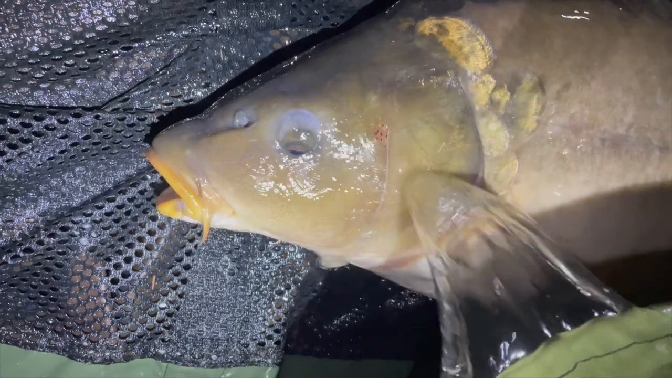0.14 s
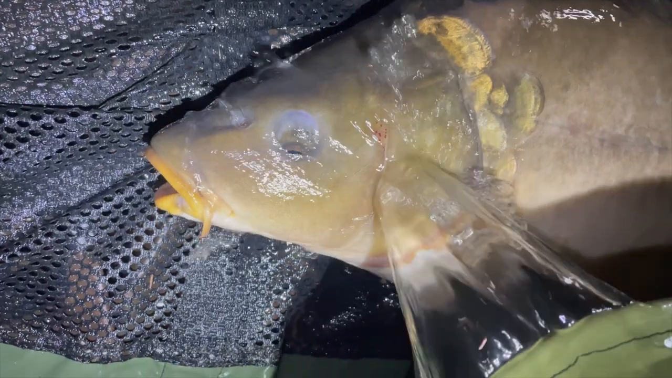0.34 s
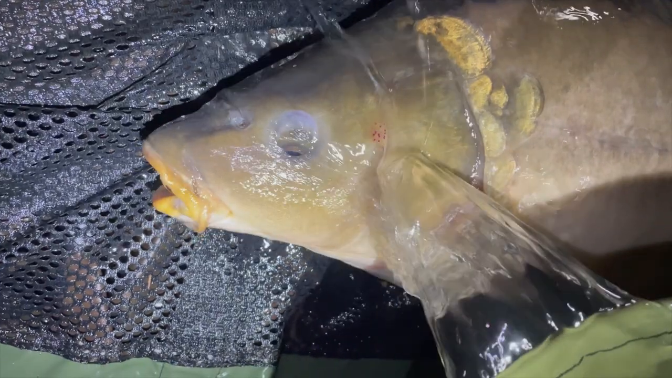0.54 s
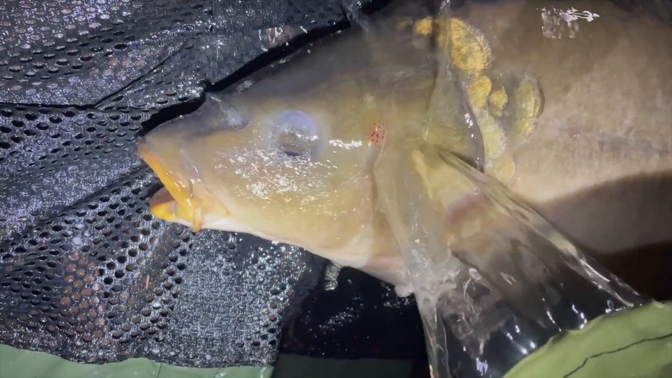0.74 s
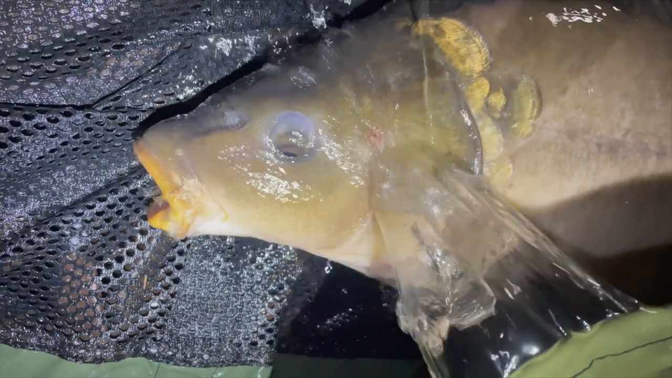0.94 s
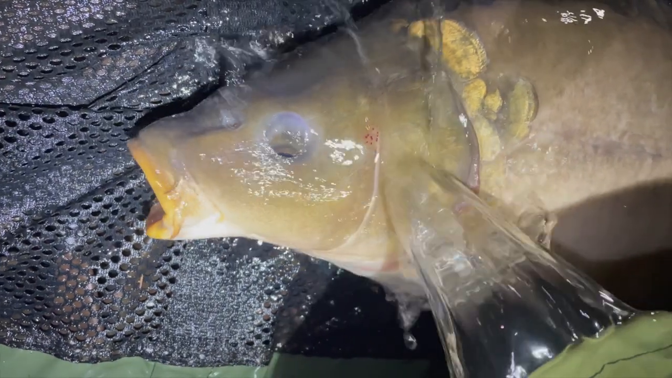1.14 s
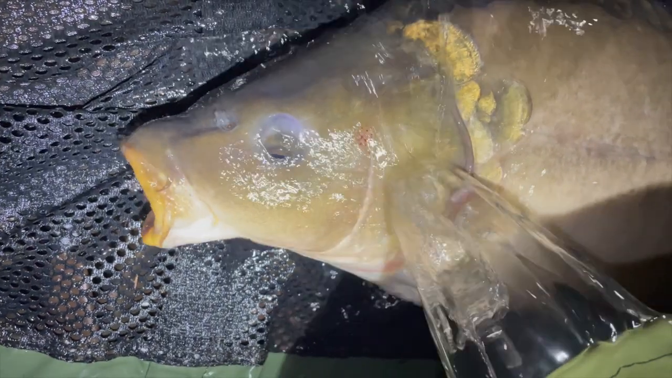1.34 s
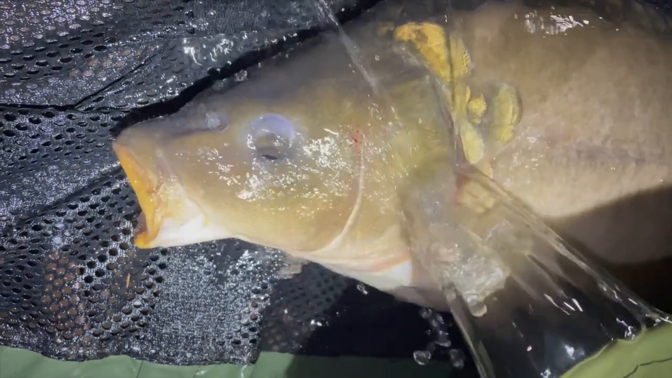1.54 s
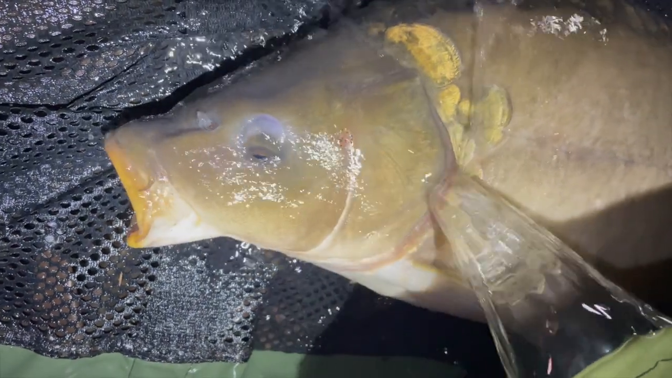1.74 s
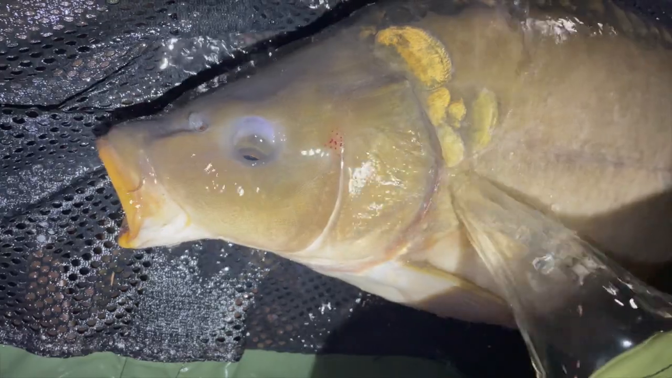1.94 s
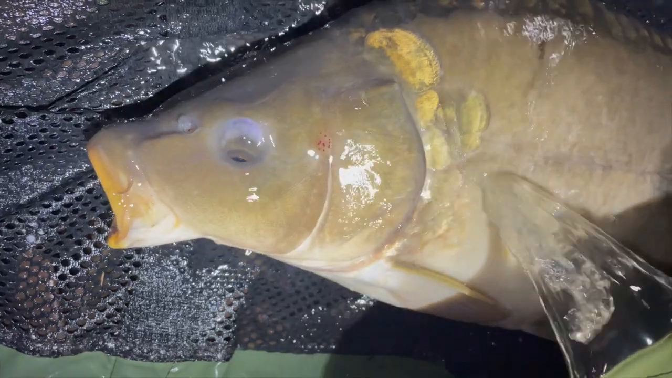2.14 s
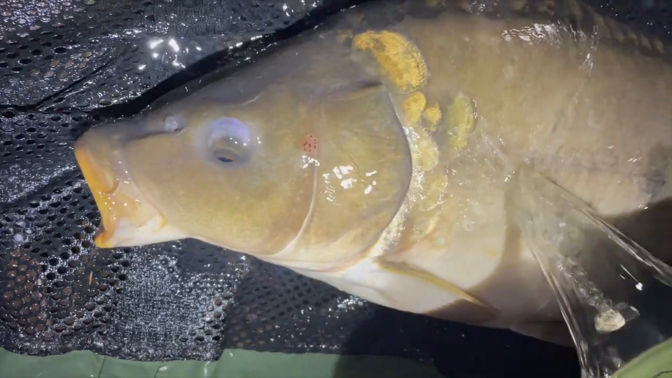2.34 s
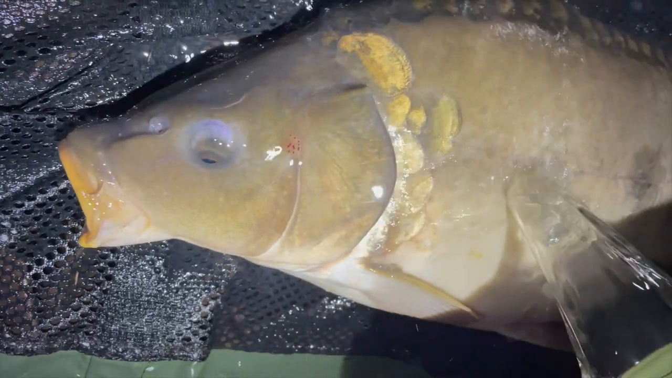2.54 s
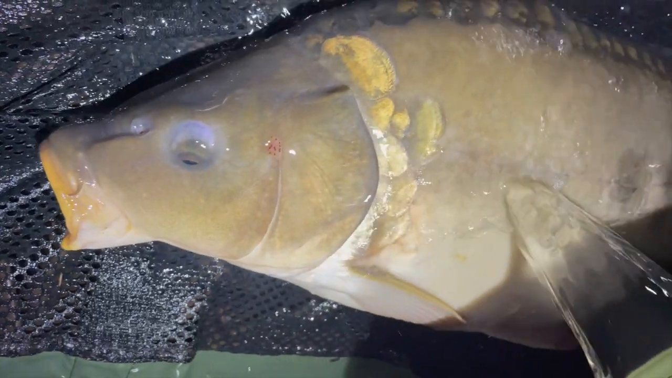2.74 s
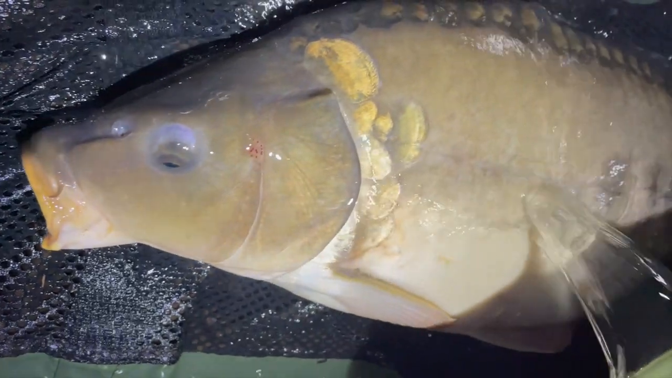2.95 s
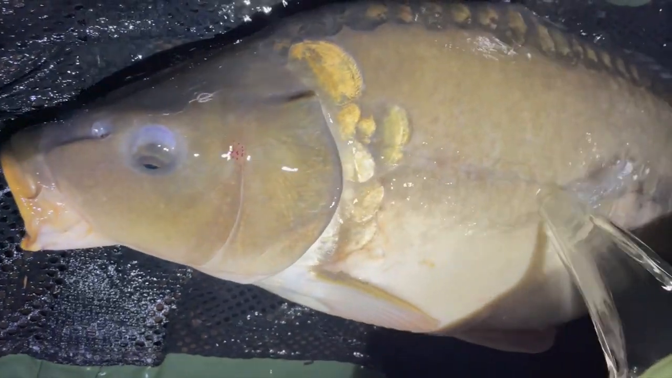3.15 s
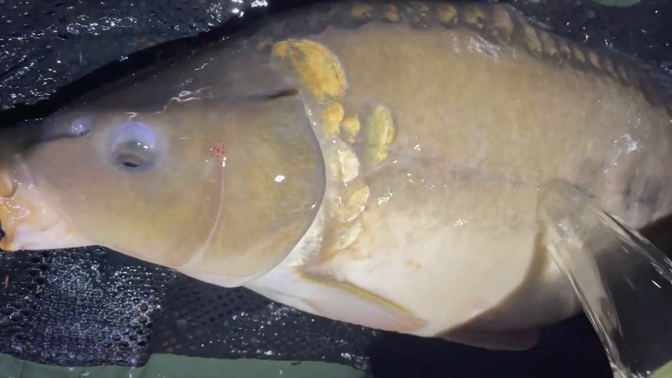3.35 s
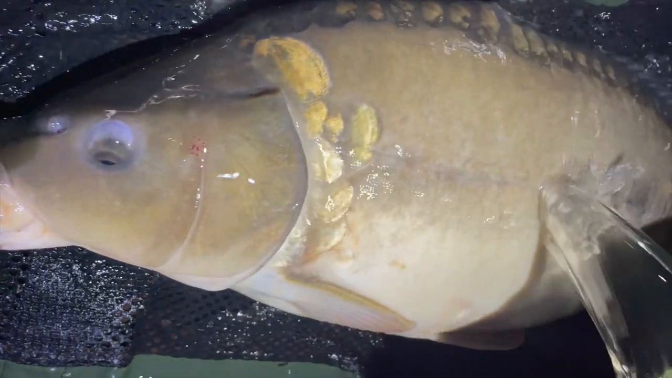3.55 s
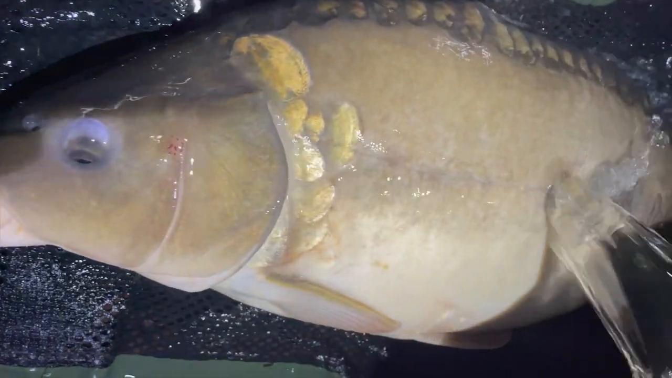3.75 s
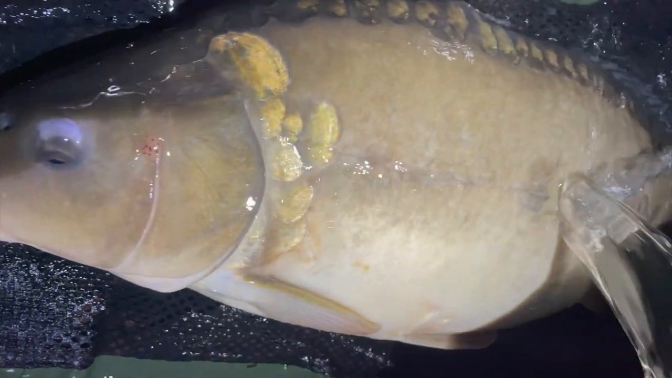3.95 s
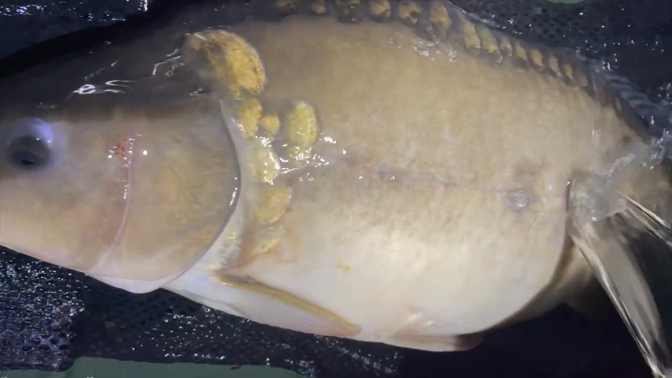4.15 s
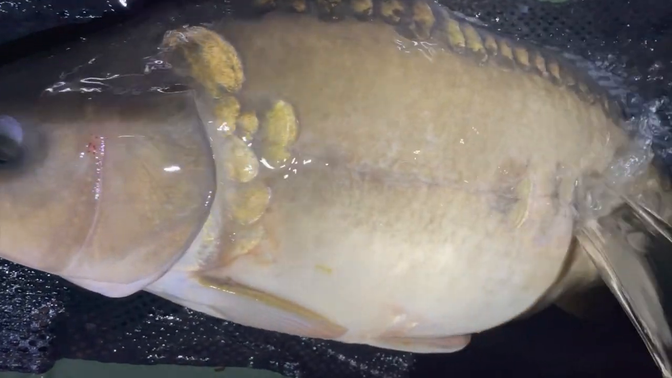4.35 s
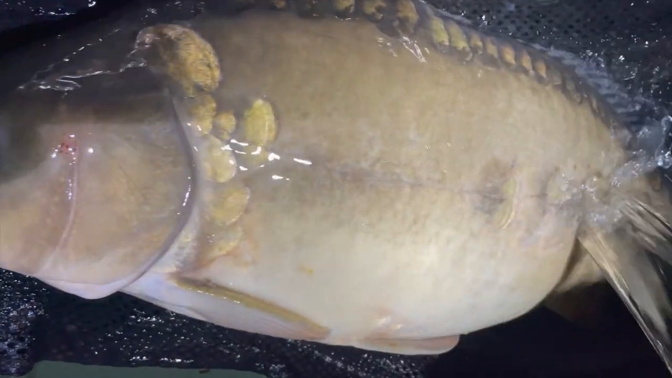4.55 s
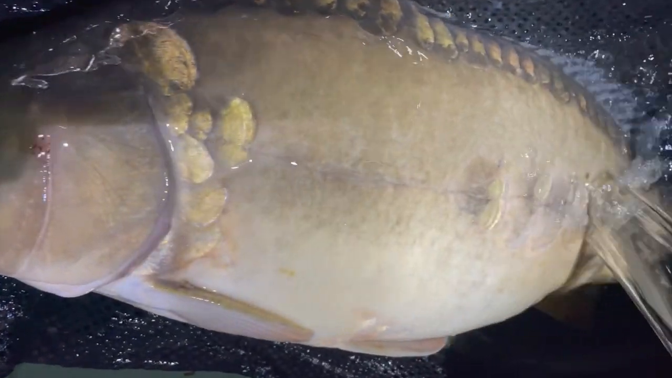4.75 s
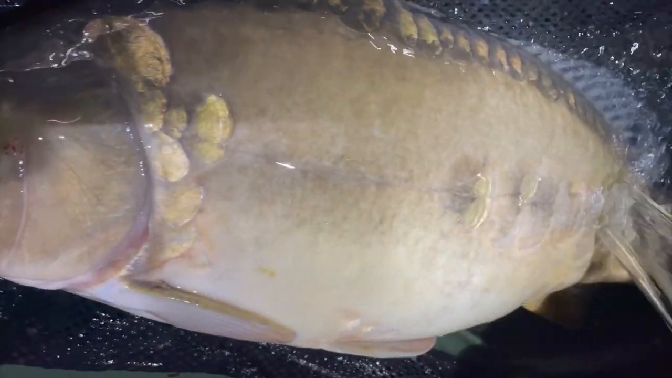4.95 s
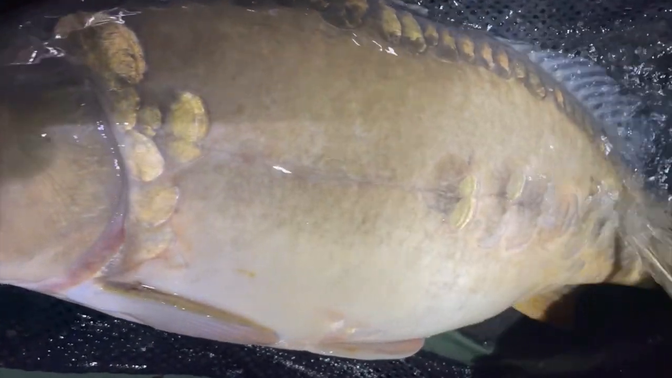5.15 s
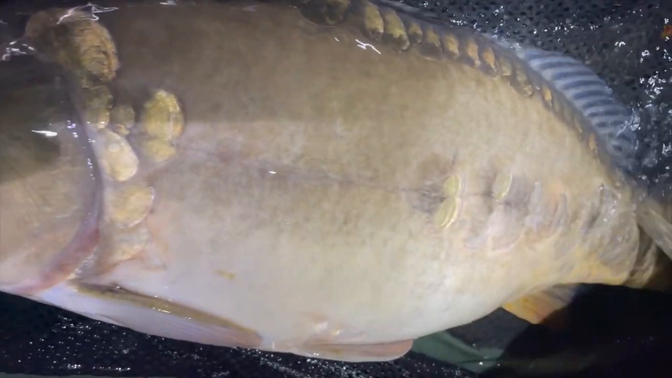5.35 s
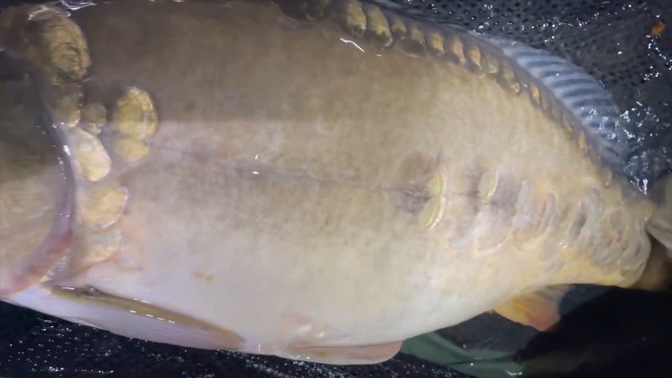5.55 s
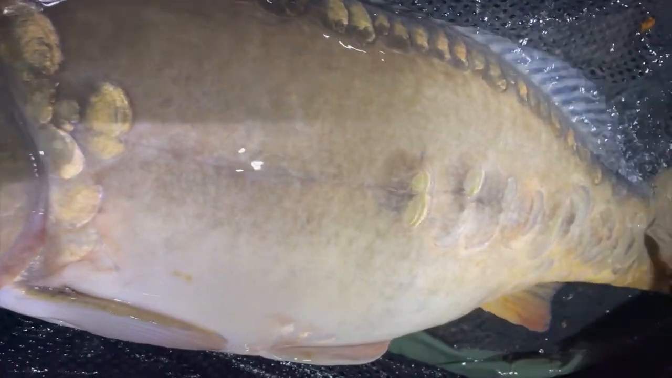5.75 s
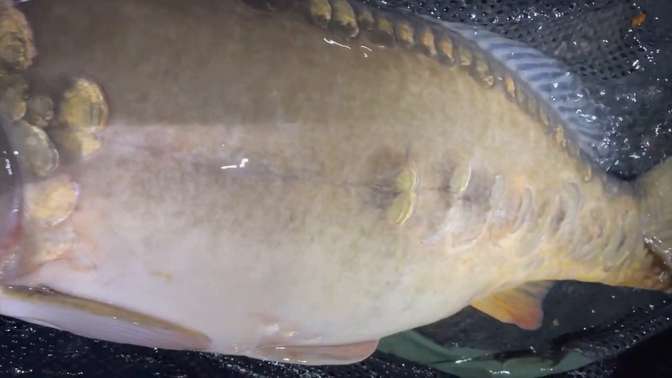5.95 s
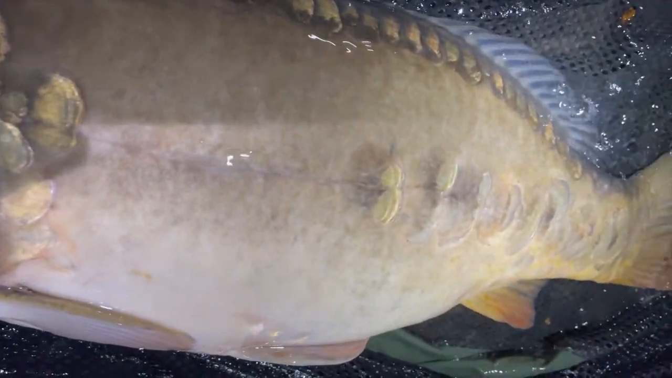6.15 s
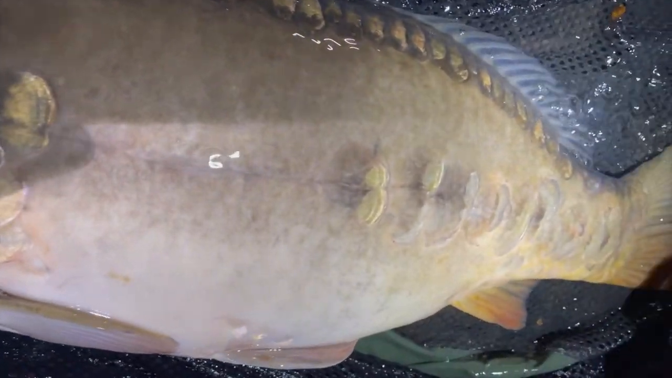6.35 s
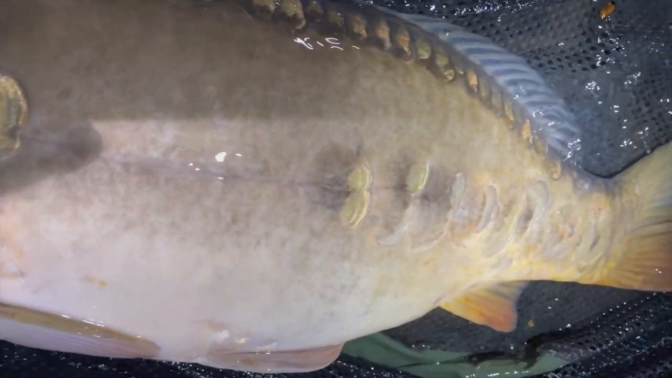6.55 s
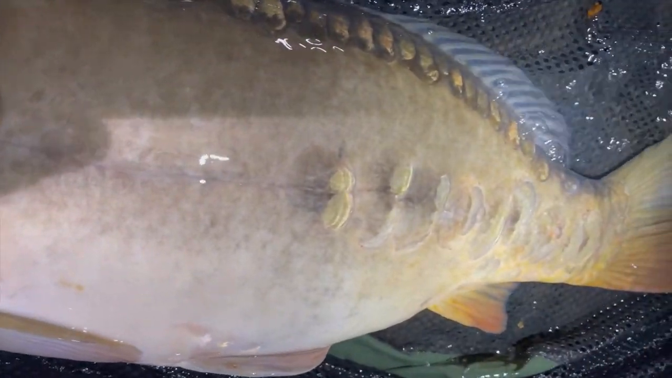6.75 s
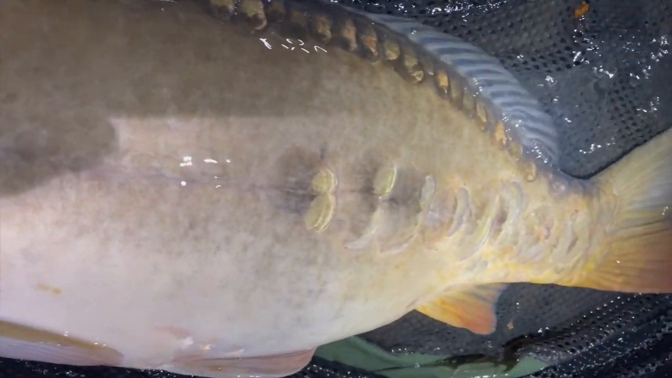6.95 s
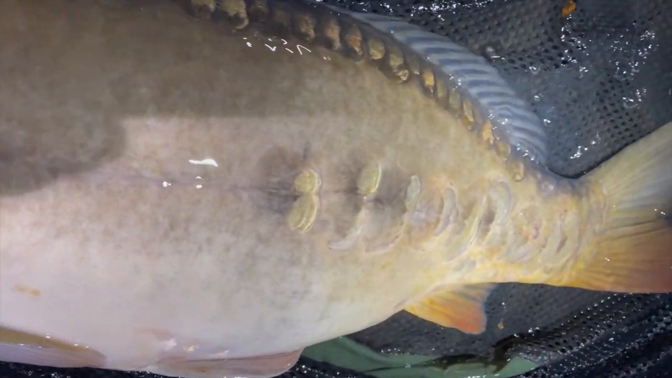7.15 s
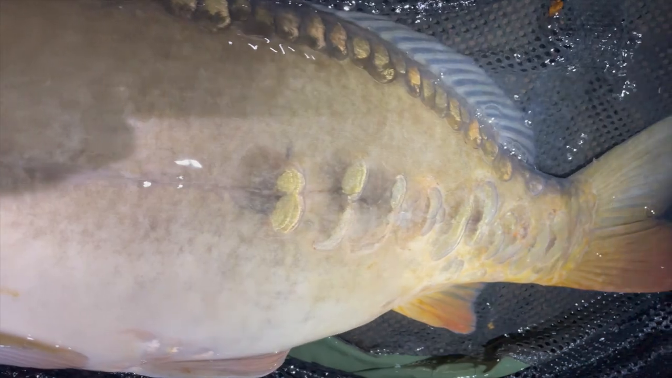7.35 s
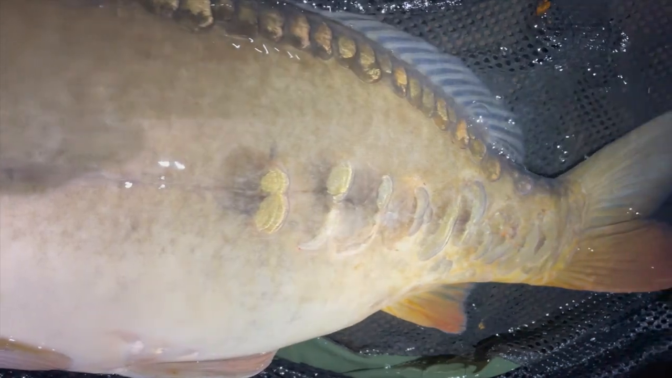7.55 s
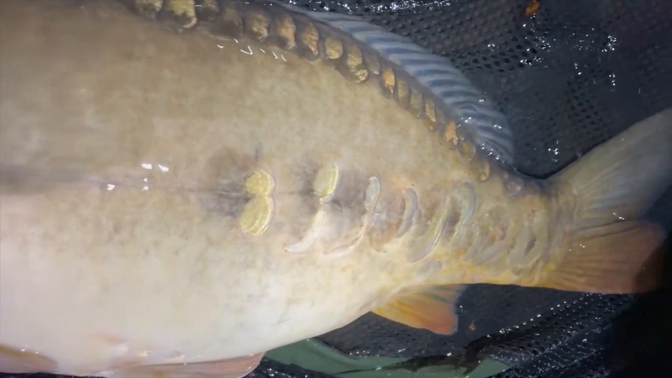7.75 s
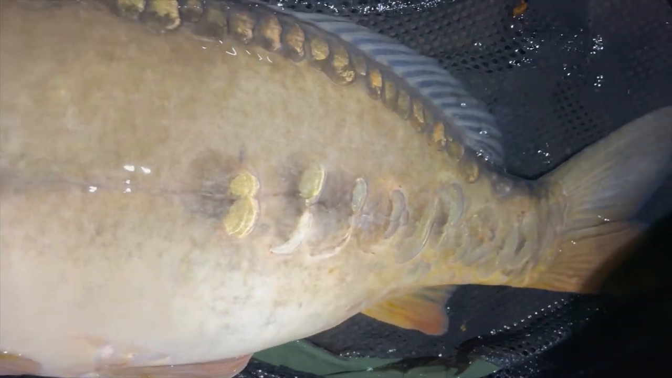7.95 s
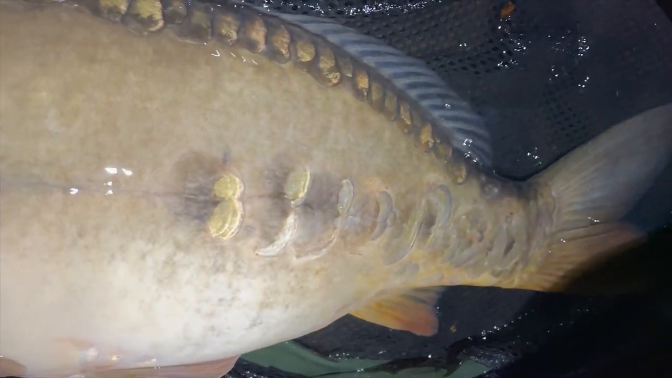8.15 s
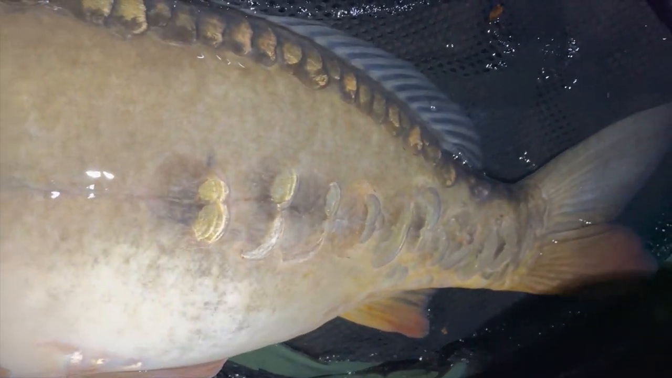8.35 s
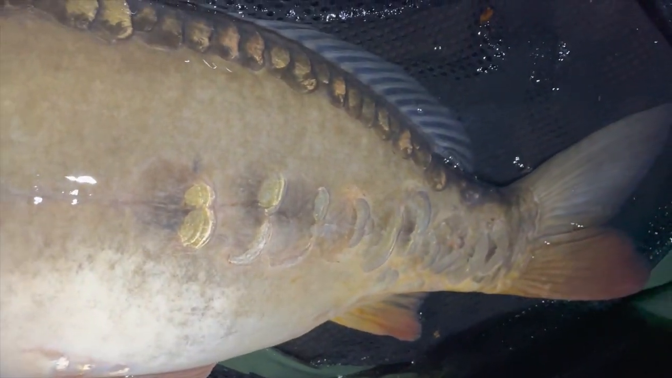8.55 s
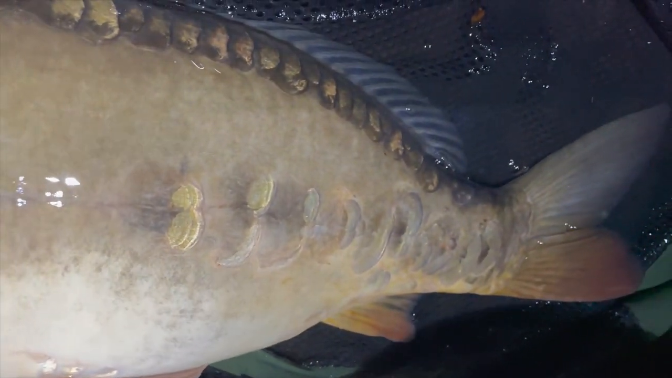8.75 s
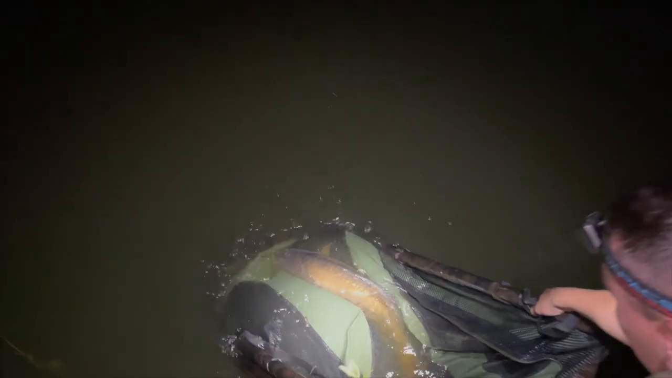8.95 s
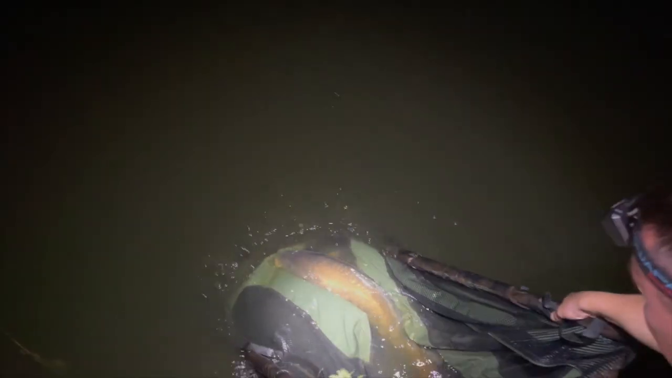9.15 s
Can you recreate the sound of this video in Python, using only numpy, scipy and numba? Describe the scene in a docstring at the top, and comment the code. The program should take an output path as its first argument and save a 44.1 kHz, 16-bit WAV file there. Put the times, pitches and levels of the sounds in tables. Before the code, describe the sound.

Water pours and gurgles over a fish on a wet mesh mat, thins to faint drips and fizz, then cuts to dull lakeside slosh.

```python
"""On a wet mesh mat at night, water is poured over a fish: entrained air rings as short bubbles, impacts tick
and splatter, and the mat then drains and fizzes over a low distant rumble. At the end the scene jumps to the
lake's edge, with a steady far wash and a dull slosh. Bubbles and impacts are decaying sine grains, singly or
in random crowds; hiss, rumble and wash are filtered noise."""
import sys
import numpy as np
from scipy import signal
from scipy.fft import rfft, irfft, next_fast_len
from scipy.io import wavfile
from scipy.ndimage import uniform_filter1d
from numba import njit

SR = 44100
rng = np.random.default_rng(int(sys.argv[2]) if len(sys.argv) > 2 else 0)


def transcribe(signal):
    """Save signal, clipped to [-1, 1], as a 16-bit WAV file at the path in sys.argv[1]."""
    frames = np.atleast_2d(signal).T
    limited = np.clip(frames, -1, 1)
    pcm = np.round(limited * 32767).astype(np.int16)
    wavfile.write(sys.argv[1], SR, pcm)


N = 409688
SIZE = next_fast_len(N)

# Levels and peaks in the tables are nominal: the stages that follow add to them.
# Steady stream under the splashes. Each row: time in seconds, gurgle level in dB, spray level in dB.
FLOW = [(0, -50, -58), (.14, -53.5, -57.5), (.3, -43, -49.5), (.38, -61, -53.5), (.42, -55, -65),
        (.46, -42.5, -43), (.7, -49, -46.5), (.9, -42.5, -42), (1.25, -46.5, -44.5), (1.75, -45.5, -46.5),
        (1.87, -51.5, -52), (2.08, -54.5, -51.5), (2.2, -47, -49.5), (2.38, -52.5, -51.5),
        (2.56, -49, -53.5), (2.9, -45.5, -52.5), (3.25, -48.5, -55.5), (3.75, -52.5, -52.5),
        (4.2, -47, -49), (4.7, -49.5, -49), (5.0, -47, -44.5), (5.4, -49, -45), (5.76, -56.5, -53),
        (5.82, -67, -57), (6.3, -67, -58.5), (6.7, -65, -66.5), (7.2, -66, -56), (7.6, -68, -63),
        (8.12, -67, -68.5), (8.2, -62, -57), (8.29, -68.5, -71), (8.88, -74, -80)]
# Clear bubbles and deep plops. Each row: start in seconds, peak in dB, pitch in Hz, ring t60 in seconds, rise in ms.
BUBBLES = [(0.2465, -26.5, 1680, 0.032, 1.3), (0.261, -39, 1550, 0.041, 2.3),
           (0.288, -34, 2290, 0.014, 1.4), (0.2857, -33, 1890, 0.021, 1.1), (0.302, -30, 1660, 0.028, 1.7),
           (0.304, -27.5, 1090, 0.0324, 1.7), (0.3237, -41.5, 1100.0, 0.14, 5.4),
           (0.3563, -21.5, 1180, 0.0093, 3.4), (0.447, -31, 1330, 0.023, 2.3),
           (0.464, -23.5, 1047, 0.0287, 4.4), (0.503, -30, 1440, 0.019, 1.6),
           (0.5302, -37, 1450, 0.022, 1.1), (0.585, -36, 2230, 0.026, 6.0), (0.586, -26.5, 1040, 0.0219, 3),
           (0.6168, -34.5, 2750, 0.024, 1.1), (0.627, -36, 2700, 0.011, 3.6),
           (0.6377, -37, 1086, 0.036, 1.7), (0.78, -27.5, 2680, 0.0083, 1.1),
           (0.8112, -30, 770, 0.013, 0.84), (0.853, -31.5, 1040, 0.016, 1.4), (0.879, -42, 383, 0.011, 3.1),
           (0.9074, -33.5, 2200, 0.049, 1.1), (0.922, -35, 1970, 0.033, 1.7),
           (0.9237, -28, 1060, 0.028, 1.3), (0.9447, -33, 1840.0, 0.026, 5.1),
           (0.9506, -33, 1080, 0.023, 1.4), (0.9576, -34.5, 2690, 0.035, 0.7),
           (0.9894, -36.5, 2300, 0.024, 2.6), (1.0456, -31, 1610, 0.018, 2.0),
           (1.074, -32.5, 1100, 0.015, 2.0), (1.11, -29.5, 1010, 0.019, 1.1), (1.168, -35.5, 610, 0.026, 3),
           (1.2747, -36.5, 2000, 0.034, 1.6), (1.3289, -27, 2310, 0.015, 1.5),
           (1.331, -37, 1140, 0.014, 5.4), (1.3434, -38, 1060, 0.032, 1.8), (1.3607, -35, 3080, 0.013, 1),
           (1.371, -26.5, 1150, 0.015, 5.8), (1.3932, -34, 2210, 0.033, 1.4),
           (1.3946, -23, 1170, 0.02, 0.98), (1.4445, -30, 726, 0.021, 0.46),
           (1.4596, -32.5, 1440, 0.026, 2.3), (1.483, -32.5, 2270, 0.018, 4.6),
           (1.5268, -30.5, 1112, 0.029, 1.4), (1.5589, -32.5, 1880, 0.038, 2.2),
           (1.575, -39.5, 325, 0.034, 1.4), (1.6237, -38, 1160, 0.042, 1.7),
           (1.6738, -30.5, 1146, 0.028, 0.96), (1.694, -28, 656, 0.031, 0.7),
           (1.6932, -28.5, 1190, 0.016, 2.3), (1.7304, -25.5, 2280, 0.015, 0.84),
           (1.7349, -34, 1480, 0.019, 3.6), (1.737, -37, 1100, 0.041, 4.6),
           (1.7502, -28.5, 1190, 0.021, 2.0), (1.791, -36.5, 1690, 0.039, 3.1),
           (1.8074, -37.5, 1050, 0.052, 1.4), (1.856, -41, 820, 0.03, 1.4), (1.9106, -37, 1340, 0.047, 3.7),
           (1.914, -30.5, 2050, 0.021, 0.62), (1.9676, -28.5, 2730, 0.0068, 0.99),
           (1.968, -29.5, 2230, 0.026, 1.7), (2.0046, -47, 454, 0.036, 6.6), (2.0705, -43, 463, 0.034, 1.4),
           (2.124, -45, 460.0, 0.017, 2.8), (2.1302, -32.5, 1670, 0.018, 1.7),
           (2.1325, -37.5, 2265, 0.073, 4.9), (2.1396, -35, 1503, 0.054, 4.4),
           (2.157, -31, 1475, 0.024, 2.3), (2.2096, -30.5, 2770, 0.008, 0.64),
           (2.239, -41, 987, 0.073, 1.7), (2.2545, -32.5, 3340, 0.008, 0.3), (2.38, -41, 2900, 0.008, 0.3),
           (2.2537, -41, 1725, 0.012, 4.9), (2.4353, -41.5, 580, 0.036, 1.7),
           (2.4613, -31, 2810, 0.021, 0.34), (2.5313, -30, 2000, 0.019, 1.1),
           (2.5473, -35.5, 1720, 0.02, 2.6), (2.548, -37.5, 2255, 0.04, 3.9),
           (2.552, -35, 2810, 0.018, 1.4), (2.6057, -40, 2740, 0.038, 2.8),
           (2.6364, -43, 1500.0, 0.027, 1.4), (2.6945, -38.5, 2170, 0.026, 1.7),
           (2.784, -36.5, 1730, 0.028, 4.1), (2.7883, -31.5, 395, 0.025, 2.3),
           (2.8132, -44, 674, 0.044, 2.6), (2.877, -28.5, 1480.0, 0.028, 3.7),
           (2.916, -41, 1044, 0.036, 2.2), (2.973, -44.0, 430, 0.063, 3.5), (3.0107, -34, 1380, 0.016, 3.1),
           (3.013, -26.5, 2840, 0.0086, 0.65), (3.022, -29.5, 2650, 0.0073, 0.7),
           (3.0236, -41, 420, 0.036, 3.5), (3.1148, -37.5, 2290, 0.019, 2.8),
           (3.1702, -35.5, 1490, 0.021, 1.2), (3.506, -42, 403, 0.033, 2.2),
           (3.5669, -44.5, 733, 0.049, 2.5), (3.678, -45, 1340, 0.019, 3.1),
           (3.8655, -42.5, 1990, 0.06, 1.4), (3.8807, -36.5, 1690, 0.0095, 3.3),
           (4.0002, -48, 463, 0.063, 3.9), (4.014, -41.5, 1450, 0.091, 3.1),
           (4.1193, -39.5, 707, 0.04, 4.8), (4.1857, -42, 1420, 0.037, 5.9), (4.1863, -41, 704, 0.085, 3.4),
           (4.1994, -37, 2940, 0.021, 1.4), (4.202, -35.5, 1640, 0.049, 2.8),
           (4.2134, -35, 1310, 0.019, 1.4), (4.2456, -39, 2250, 0.017, 1.1), (4.246, -36, 3140, 0.018, 1.1),
           (4.2556, -29.5, 2410, 0.025, 1.3), (4.2577, -39, 1310, 0.039, 1.9),
           (4.2925, -33.5, 3480, 0.015, 1.1), (4.295, -38.5, 1580, 0.046, 1.4),
           (4.4603, -30, 2346, 0.032, 0.7), (4.511, -27.5, 1596, 0.0294, 1.7),
           (4.5106, -38.5, 440.0, 0.038, 4.4), (4.585, -38.5, 1360, 0.042, 1),
           (4.6212, -31, 2310, 0.021, 2.2), (4.6306, -24, 3050, 0.0096, 0.7),
           (4.635, -37, 1360, 0.048, 6.0), (4.737, -43, 840, 0.044, 2.3), (4.7473, -30, 2900, 0.02, 1.1),
           (4.7728, -36.5, 1320, 0.02, 1.4), (4.7897, -30, 4430, 0.036, 0.7),
           (4.8044, -36, 1400, 0.0092, 2.6), (4.8232, -33, 1385, 0.061, 2.0),
           (4.8403, -31, 1352, 0.028, 6.0), (4.8848, -27.5, 2310, 0.042, 1.9),
           (4.889, -31, 2980, 0.013, 2.6), (4.9117, -30.5, 1395, 0.031, 2.0), (4.9527, -37, 756, 0.047, 1),
           (4.9759, -35, 745, 0.021, 1.7), (4.9766, -32, 2895, 0.066, 1.1),
           (4.989, -29.5, 1380, 0.014, 1.6), (5.019, -34.5, 1630, 0.04, 0.7),
           (5.099, -32, 3100, 0.008, 0.3), (5.205, -30.5, 2930, 0.012, 0.3), (5.29, -33, 2930, 0.007, 0.3),
           (5.0606, -26.5, 1336, 0.026, 2.7), (5.0713, -34, 2690, 0.025, 5.9),
           (5.2177, -30, 1400, 0.019, 5.4), (5.252, -31.5, 2810, 0.03, 0.7),
           (5.252, -28.5, 2380, 0.03, 1.2), (5.276, -42, 1520, 0.097, 3.9), (5.299, -32, 1340, 0.012, 6.0),
           (5.3173, -35, 2230, 0.025, 1.1), (5.3214, -23.5, 1230, 0.031, 3.1),
           (5.338, -29, 1560, 0.0099, 3.1), (5.363, -33, 2320, 0.096, 1.4), (5.3755, -37, 1750, 0.085, 0.7),
           (5.3835, -30, 2950, 0.017, 1.1), (5.3852, -30.5, 2060, 0.021, 3.9),
           (5.3995, -26.5, 2260, 0.051, 1.3), (5.401, -37, 1540, 0.05, 3.1), (5.402, -30, 2880, 0.025, 0.7),
           (5.414, -35.5, 2300, 0.028, 4.4), (5.4456, -48, 534, 0.051, 4.9),
           (5.4525, -35, 2290, 0.013, 1.4), (5.476, -35, 1305, 0.045, 2.1),
           (5.5526, -36.5, 1120, 0.0433, 0.76), (5.6958, -35.5, 2300, 0.029, 1.3),
           (6.1058, -29, 3480, 0.012, 0.4), (6.154, -36.5, 2300, 0.053, 0.9),
           (6.1553, -43, 3630, 0.0068, 0.7), (7.468, -40, 2940, 0.0092, 0.7),
           (7.6996, -43, 424, 0.021, 0.96), (7.8617, -33.5, 336, 0.028, 1.7),
           (8.3937, -39, 3550, 0.0061, 0.2), (6.1845, -45, 2140, 0.018, 0.5),
           (6.377, -52, 3470, 0.012, 0.4), (6.4923, -50, 2150, 0.015, 0.4), (6.5122, -52, 2900, 0.015, 0.4),
           (6.8175, -52, 2200, 0.0089, 0.3), (6.864, -56, 1990, 0.008, 0.3), (8.638, -54, 3430, 0.014, 0.4),
           (7.237, -54, 1050, 0.03, 1.5), (6.418, -45, 280, 0.03, 2), (6.931, -44, 196, 0.037, 3),
           (7.321, -48.5, 450, 0.025, 1.5), (0.352, -27, 1100, 0.037, 1.0), (5.3178, -26, 1310, 0.02, 0.34),
           (6.285, -58.5, 1170, 0.048, 2.0), (6.298, -51, 3050, 0.022, 0.7),
           (6.7565, -46, 3300, 0.012, 0.5)]
# Drops that strike skin and mesh. Each row: start in seconds, peak in dB, centre in Hz, width in octaves,
# t60 in seconds before it is shortened by the width.
TICKS = [(0.1068, -33.5, 3870, 1.64, 0.017), (0.1504, -32, 3940, 0.94, 0.033),
         (0.283, -28.5, 4160, 1.6, 0.018), (0.3152, -28, 6270, 1.2, 0.0098),
         (0.375, -39, 6800, 0.92, 0.025), (0.4415, -32, 3640, 2.8, 0.016), (0.4557, -33, 6850, 0.84, 0.038),
         (0.682, -35, 5900, 0.63, 0.013), (0.799, -22, 3820, 1.57, 0.017), (0.895, -21, 3800, 2, 0.014),
         (0.961, -25, 6900, 2, 0.013), (0.9887, -29, 6300, 1.9, 0.021), (1.013, -28, 6300, 0.67, 0.018),
         (1.069, -23.5, 3600, 1.7, 0.023), (1.1737, -30, 6600, 1.6, 0.019), (1.3143, -38, 7010, 2, 0.02),
         (1.3323, -27, 5900, 1.2, 0.02), (1.363, -23, 3770, 1.6, 0.026), (1.4157, -30.5, 6550, 1.5, 0.023),
         (1.4622, -30, 6500, 1, 0.02), (1.482, -20, 5130, 1.2, 0.018), (1.531, -21.5, 8060, 3.9, 0.018),
         (1.5776, -27.5, 6100, 0.43, 0.022), (1.614, -30.5, 6200, 0.76, 0.026),
         (1.644, -21, 6440, 0.8, 0.0087), (1.6624, -28, 6660, 1.1, 0.016), (1.692, -30, 6400, 1.5, 0.015),
         (1.7348, -17.5, 3530, 2.1, 0.018), (1.766, -26, 4670, 0.88, 0.038),
         (1.905, -24.5, 6550, 1.6, 0.02), (1.989, -37, 6400, 0.89, 0.017), (2.1266, -26, 5870, 1.8, 0.015),
         (2.177, -34, 6350, 0.45, 0.025), (2.399, -35, 6600, 1.3, 0.028), (2.767, -33, 4050, 1.8, 0.035),
         (2.813, -35, 7900, 0.78, 0.023), (2.8643, -23, 7240, 1.32, 0.013), (2.928, -28, 6440, 2, 0.018),
         (3.0135, -23, 4400, 1.8, 0.01), (3.044, -28.5, 3680, 2.06, 0.018), (3.1333, -35, 3670, 1.3, 0.02),
         (3.5524, -28, 5710, 0.81, 0.035), (3.605, -37, 3940, 0.52, 0.028),
         (3.6144, -27.5, 5950, 0.73, 0.029), (3.714, -34, 5740, 1.24, 0.016),
         (3.8052, -35, 5960, 0.6, 0.012), (3.8652, -27, 5600, 0.76, 0.0094),
         (3.9857, -26, 6170, 0.21, 0.009), (3.997, -28, 3480, 2, 0.0078),
         (4.0592, -24.5, 6900, 0.55, 0.016), (4.1415, -24.5, 4000, 1.8, 0.012),
         (4.146, -24, 6240, 1.5, 0.016), (4.246, -22, 3670, 2.1, 0.022), (4.2924, -30, 3820, 0.94, 0.02),
         (4.346, -26.5, 6570, 1.6, 0.018), (4.4101, -32, 3740, 0.72, 0.02), (4.4623, -27, 3770, 1.4, 0.018),
         (4.512, -21, 3770, 1.5, 0.009), (4.6305, -21.5, 3930, 1.7, 0.026),
         (4.7486, -20, 3840, 2.2, 0.0092), (4.793, -29, 4270, 0.51, 0.025), (4.8184, -26, 3640, 1.2, 0.024),
         (4.839, -17.5, 3960, 1.43, 0.014), (4.887, -31, 6060, 0.74, 0.013),
         (4.976, -26, 3980, 0.62, 0.027), (5.0593, -26, 3780, 1.1, 0.029),
         (5.1197, -27.5, 4000, 0.65, 0.023), (5.1383, -31, 3950, 1.3, 0.024),
         (5.24, -24.5, 3770, 0.94, 0.02), (5.2775, -25.5, 3800, 1.6, 0.019),
         (5.318, -25, 3800, 0.84, 0.018), (5.3868, -28, 4100, 1.1, 0.022),
         (5.4008, -16.5, 4000, 1.7, 0.0095), (5.5363, -26, 3750, 0.73, 0.026),
         (5.5622, -33, 3670, 0.78, 0.027), (6.053, -34.5, 7070, 0.67, 0.013),
         (6.108, -24, 4980, 1.1, 0.018), (6.114, -28, 4600, 0.68, 0.013), (6.1559, -23, 4400, 0.86, 0.0042),
         (6.1968, -30.5, 6700, 1.6, 0.008), (6.2819, -44, 3050, 1.3, 0.023),
         (6.4372, -41, 3480, 2.6, 0.021), (6.4572, -44.5, 6400, 1.04, 0.012),
         (6.5435, -39.5, 7600, 1.06, 0.015), (6.793, -44, 6740, 3.3, 0.029),
         (7.3774, -38, 6870, 1.53, 0.025), (7.4679, -42, 3070, 1.2, 0.011),
         (7.8291, -34.5, 6500, 0.27, 0.01), (8.082, -48, 6400, 1.4, 0.018),
         (8.3945, -44.5, 3800, 0.76, 0.027), (8.4094, -52.5, 4360, 1.42, 0.042),
         (8.6088, -56, 3530, 0.31, 0.014), (8.808, -51, 6200, 0.43, 0.0089),
         (6.6475, -39, 1320, 2.27, 0.027)]
# Grain level across the bubble sizes. Each row: frequency in Hz, level in dB.
GURGLE_COLOUR = [(200, -24.5), (400, -14.5), (800, -3.5), (1200, 6.5), (1700, 9), (2400, 8), (3300, 6),
                 (5000, 2)]
# Grain level and hiss spectrum of the fine spray. Each row: frequency in Hz, level in dB.
SPRAY_COLOUR = [(1500, -12), (2500, -6), (3500, 0), (4500, -3.2), (5300, -2.5), (6600, 2.5), (7500, -7),
                (9000, -4.5), (10000, -31.5)]
# Air pocket under the falling sheet, where most bubbles share one size.
# Each row: time in seconds, pitch in Hz, level relative to the gurgle in dB.
POCKET = [(0, 1215, -37), (.5, 1087, -12.5), (1.701, 1159, -23), (2.099, 1477, -17.5), (3.899, 1363, -12.5),
          (4.5, 1360, -8.5), (5.5, 1346, -3), (5.801, 1327, -3.5), (6.0, 1380, -26)]
# Spectrum of the low wash of the heavy first pour. Each row: frequency in Hz, density in dB per Hz.
BODY_COLOUR = [(50, -42), (110, 0.5), (260, -5), (600, -11.5), (900, -44)]
# Course of that low wash. Each row: time in seconds, level in dB.
BODY_LEVEL = [(0, -58.5), (1.8, -55.5), (2.6, -75)]
# Spectrum of the night. Each row: frequency in Hz, density in dB per Hz.
NIGHT_COLOUR = [(18, 0), (30, 9), (65, 4.5), (100, -1), (170, -12), (260, -15.5), (420, -14), (600, -20),
                (1000, -30.5), (2500, -41), (6000, -36), (9500, -67)]
# Course of the night's rumble. Each row: time in seconds, level in dB.
RUMBLE_LEVEL = [(0, -49), (.5, -44.5), (1.8, -46), (2.4, -46.5), (5.1, -48.5), (5.8, -47.5), (6.4, -47.5),
                (8.9, -50)]
# Relation of the right channel to the left at the mat. Each row: frequency in Hz, shared part from 0 to 1,
# phase lag of the right in radians, left minus right in dB.
MAT_STEREO = [(20, .95, 0, .5), (60, .87, 0, 1), (130, .84, 0, 1.5), (250, .4, 1.2, 2.5), (400, .3, 1.0, 2),
              (700, .75, .2, -2), (1250, .35, 1.3, 2.5), (2150, .55, 1.0, 0), (2420, .65, 1.5, -4),
              (2620, .7, -.4, 3), (3880, .85, 1.9, 0), (4850, .93, 2.2, 0), (5250, .98, 3.14, 0),
              (5750, .95, 4.1, 0), (6800, .92, 5.4, 0), (7300, .9, 6.1, 0), (8180, .83, 6.8, 0),
              (9600, .83, 8.0, 0)]
# Spectrum of the far wash at the lake. Each row: frequency in Hz, density in dB per Hz.
WASH_COLOUR = [(20, -20), (60, 2), (130, -10), (180, -10.5), (260, -8), (400, -16), (650, -17),
               (950, -10.5), (1200, -16.5), (1600, -18), (2300, -28), (5500, -42.5), (6500, -36.5),
               (9000, -50), (13000, -46), (15500, -52)]
# Sloshes at the lake's edge. Each row: start in seconds, peak in dB, pitch in Hz, t60 in seconds.
SLOSHES = [(9.074, -22, 63.4, 0.15), (9.191, -25, 98, 0.064)]
# Specks of spray at the lake. Each row: start in seconds, peak in dB, centre in Hz, width in octaves,
# t60 in seconds before it is shortened by the width.
SPECKS = [(8.926, -51, 13200, 0.28, 0.008), (9.076, -63, 9000, .4, .01), (9.225, -54, 12000, 0.46, .011)]

# Each bubble churns the gurgle and each drop throws spray: level relative to the event's peak, attack, decay t60.
CHURN_DB, CHURN_ATTACK_S, CHURN_T60_S = -9, 0.0069, 0.054
THROW_DB, THROW_ATTACK_S, THROW_T60_S = -17, 0.0017, .06
CHURN_MOST_DB = 3  # the churn lifts the gurgle at most this far above its steady level
BUBBLE_GLIDE, PINCH_DB, CRACK_DB = 0.12, -1, -11  # the glide is a share of the pitch
HOLLOW_T60_S, HOLLOW_DB = 0.054, -10.5
WASH_DB, WASH_LAG_S = -43.5, 0.00035
JUMP_S = 8.888
MAT_TOP_HZ, TOP_HZ = 9650, 15300


def undb(db):
    """Amplitude ratio is ten to the power of dB over twenty."""
    return 10 ** (np.asarray(db) / 20)


def rms_one(x):
    """Division by the root mean square gives unit power."""
    return x / np.sqrt(np.mean(x ** 2))


def on_log_axis(hz, table, axis=1):
    """Spectral values are interpolated over the logarithm of frequency."""
    table = np.array(table, float)
    return np.interp(np.log(hz + 1), np.log(table[:, 0]), table[:, axis])


def over_time(table):
    """Each column after the first is interpolated linearly over time."""
    s, *columns = np.transpose(table)
    return [np.interp(np.arange(N) / SR, s, column) for column in columns]


def walk(rate):
    """Random modulation: normal values, held 1 / rate seconds, are slewed to a spread near 1."""
    hold = int(SR / rate)
    steps = np.repeat(rng.standard_normal(int(200 * N / SR)), hold)[:N]
    return 1.22 * uniform_filter1d(steps, hold)


def coloured(colour):
    """Spectral shaping: two independent white noises are given one spectrum and an rms of 1."""
    gain = undb(on_log_axis(np.fft.rfftfreq(SIZE, 1 / SR), colour))
    white = rng.standard_normal((2, SIZE))
    return rms_one(irfft(rfft(white) * gain, SIZE)[:, :N])


@njit
def ring(length, start, hz, t60, rise, glide, left, right, rate):
    """Damped oscillator: each sine decays from a soft start while its pitch climbs by the share glide."""
    out = np.zeros((2, length))
    for k in range(len(start)):
        n = int(t60[k] * rate)
        step = np.exp(2j * np.pi * hz[k] / rate - np.log(1000) / (n + 1))
        turn = np.exp(2j * np.pi * hz[k] * glide[k] / rate / (n + 1))
        z, gap, close = 1 + 0j, 1., np.exp(-1 / (rise[k] * rate))
        for i in range(start[k], min(start[k] + n, length)):
            z, step, gap = z * step, step * turn, gap * close
            out[0, i] += (1 - gap) * (z * left[k]).imag
            out[1, i] += (1 - gap) * (z * right[k]).imag
    return out


def grains(s, db, hz, t60, pan_db, rise_s, glide, scatter=1):
    """Interchannel phase: scattered places give each grain its own phase in the right channel."""
    phase = np.exp(2j * np.pi * scatter * (rng.random(len(s)) - .5))
    left = undb(db + pan_db / 2) + 0j
    right = undb(db - pan_db / 2) * phase
    start = (s * SR).astype(np.int64)
    return ring(N, start, hz, t60, rise_s + 0 * hz, glide + 0 * hz, left, right, SR + 0.)


def swarm(count, colour, cycles, scatter_db, clump_db, patch_db, clump_rate, glide):
    """Superposition of random grains: all bunch in time, like sizes also in patches; rms 1."""
    u = rng.random((count, 5)).T
    low, high = colour[0][0], colour[-1][0]
    s = u[0] * (N - 1) / SR
    hz = low * (high / low) ** u[1]
    at = (s * SR).astype(int)
    size_class = (7 * u[1]).astype(int)
    clump = clump_db * walk(clump_rate)[at]
    patch = patch_db * walk(clump_rate)[(at + size_class * (N // 7)) % N]
    bunch_db = np.minimum(clump + patch, 4.0)  # no patch towers over the stream
    strength = -np.log(u[2] + .08)  # few strong, many weak
    db = on_log_axis(hz, colour) + bunch_db + scatter_db * strength
    t60, pan_db = cycles * (.5 + u[3]) / hz, 8 * (u[4] - .5)
    return rms_one(grains(s, db, hz, t60, pan_db, 1.0 / hz, glide))


def stirred(steady_db, events, below_db, attack_s, t60):
    """Addition of powers: a swell builds up to each event and dies after it, on top of a steady level in dB."""
    s, db = np.transpose(events)[:2]
    power = np.zeros(N)
    np.add.at(power, (s * SR).astype(int), undb(2 * (db + below_db)))
    t = np.arange(-SR // 10, SR // 10 + 1) / SR
    swell = np.exp(2 * np.where(t < 0, t / attack_s, -np.log(1000) * t / t60))
    added = np.abs(signal.oaconvolve(power, swell, mode="same"))
    return 10 * np.log10(undb(2 * steady_db) + added)


def stream():
    """Bubble resonance: long and choked rings of all sizes gurgle; fine spray crackles over a wet hiss."""
    steady_db, spray_db = over_time(FLOW)
    churned_db = stirred(steady_db, BUBBLES, CHURN_DB, CHURN_ATTACK_S, CHURN_T60_S)
    gurgle_db = np.minimum(churned_db, steady_db + CHURN_MOST_DB)
    spray_db = stirred(spray_db, TICKS, THROW_DB, THROW_ATTACK_S, THROW_T60_S)
    thin = np.clip((-52.5 - spray_db) / 10, 0, 1)  # a thin draining film hisses more than it crackles

    gurgle = swarm(count=6000, colour=GURGLE_COLOUR, cycles=46.5, scatter_db=4.5,
                   clump_db=2.5, patch_db=4.0, clump_rate=21.0, glide=0.1)
    splatter = swarm(count=20000, colour=GURGLE_COLOUR, cycles=15.4, scatter_db=4.5,
                     clump_db=3.5, patch_db=2.5, clump_rate=39.0, glide=0.24)
    fizz = swarm(count=18000, colour=SPRAY_COLOUR, cycles=26.0, scatter_db=5.0,
                 clump_db=4.5, patch_db=6.0, clump_rate=60., glide=0.1)
    flutter_db = 4.6 * (1 - 0.57 * thin) * walk(40.)
    hiss = coloured(SPRAY_COLOUR) * undb(-9.5 + 4.2 * thin + flutter_db)

    water = gurgle * undb(-10.5 * thin) + splatter * undb(-4.0 - 2.6 * thin) + pocket()
    spray = fizz * undb(-8.0 * thin) + hiss
    return water * undb(gurgle_db) + spray * undb(spray_db)


def pocket(count=1200):
    """Like bubble sizes share a resonance: longer rings lie near one slowly moving pitch, left of centre."""
    u = rng.random((count, 4)).T
    s, pitch_hz, _ = np.transpose(POCKET)
    at = u[0] * s[-1]
    hz = np.interp(at, s, pitch_hz) * (1 + 0.17 * (u[1] - .5))
    db = -3.0 * np.log(u[2] + 0.091)
    t60 = 0.012 + 0.059 * u[3]
    crowd = grains(at, db, hz, t60, 12.0 + 0 * at, 0.0033, 0.05)
    return rms_one(crowd) * undb(over_time(POCKET)[1])


def bubbles(count=2):
    """Free bubble oscillation: a ring swells, climbs in pitch and dies; close neighbours roughen it."""
    s, db, hz, t60, rise_ms = np.transpose(BUBBLES)
    t60, rise_s = np.clip(t60, .005, .2), np.clip(rise_ms, .1, 10) / 1000
    pace = np.log(1000) * rise_s / t60
    crest = (1 + 1 / pace) ** -pace / (1 + pace)  # height of a ring with a soft start
    clear_db = db + 0.5 - 20 * np.log10(crest)
    clear = grains(s, clear_db, hz, t60, 0 * s, rise_s, BUBBLE_GLIDE, scatter=0.73)
    # the neck pinches off with a click
    pinch_db = db + PINCH_DB - 4.9 * 1000 * rise_s
    pinch = grains(s, pinch_db, 1.4 * hz, 7.3 / hz, 0 * s, 0.00014, 0, scatter=0)

    s, db, hz, t60 = np.repeat([s, db, hz, t60], count, axis=1)
    u = rng.random((len(s), 2)).T
    near_s = s + 0.25 * t60 * u[0]
    near_db = db - 4.5 - 5.1 * (hz < 500)
    near_hz = hz * 2 ** (0.63 * (u[1] - .4))
    neighbours = grains(near_s, near_db, near_hz, 0.74 * t60, 0 * s, 0.00026, 0.21)
    return clear + pinch + neighbours


def ticks(table, count=10):
    """Impact excitation: a drop bursts into short rings across its width, most at once and some trailing."""
    s, db, hz, octaves, t60 = np.repeat(np.array(table, float), count, axis=0).T
    u = rng.random((len(s), 2)).T
    place = (np.arange(len(s)) % count + u[1]) / count - .5
    late = 0.28 * u[0] ** 5.  # as a share of t60
    spread_hz = np.clip(hz * 2 ** (octaves * place), 100, 16000)
    ring_s = np.clip(t60 / (1 + np.abs(octaves)), .002, .04)  # a wide splat dies faster than a narrow ping
    # the contact itself, all at once
    crack = grains(s, db + CRACK_DB, spread_hz, 12.7 / spread_hz, 0 * s, 0.0002, 0, scatter=0)
    burst = grains(s + late * t60, db - 5.0 - 25 * late, spread_hz, ring_s, 0 * s, 0.00046, 0)
    return crack + burst


def hollow(pair):
    """Dense reflection: the raised walls of the mat return a short decaying tail after every drop."""
    s = np.arange(SR // 20) / SR
    decay = np.exp(-np.log(1000) * s / HOLLOW_T60_S)
    tail = rng.standard_normal((2, len(s))) * decay * (s > .001)
    tail = tail / np.sqrt(np.sum(tail ** 2, axis=1, keepdims=True))  # unit energy
    return pair + undb(HOLLOW_DB) * signal.oaconvolve(pair, tail, axes=1)[:, :N]


def heavy_pour():
    """Broadband turbulence: low noise of wavering level carries the weight of the first pour."""
    return coloured(BODY_COLOUR) * undb(over_time(BODY_LEVEL)[0] + 7.4 * walk(9.8))


def night():
    """Low noise with slow and fast level modulation: the distant rumble wavers."""
    waver_db = 1.45 * walk(5.0) + 1.13 * walk(20.)
    return coloured(NIGHT_COLOUR) * undb(over_time(RUMBLE_LEVEL)[0] + waver_db)


def stereo(pair, table_at):
    """Partial coherence: the right channel has a shared, delayed part of the left and sound of its own."""
    left, own = rfft(pair, SIZE)
    share, late, pan_db = table_at(np.fft.rfftfreq(SIZE, 1 / SR))
    share = np.clip(share, 0, 1)
    right = share * left * np.exp(-1j * late) + np.sqrt(1 - share ** 2) * own
    both = np.array([left * undb(pan_db / 2), right * undb(-pan_db / 2)])
    return irfft(both, SIZE)[:, :N]


def mat():
    """Superposition of the pour and the night, low-passed to a duller top end than at the lake."""
    pour = hollow(stream() + bubbles() + ticks(TICKS))
    pair = pour + night() + heavy_pour()
    pair = stereo(pair, lambda hz: [on_log_axis(hz, MAT_STEREO, axis=k) for k in (1, 2, 3)])
    return signal.sosfilt(signal.ellip(10, .2, 60, MAT_TOP_HZ, fs=SR, output="sos"), pair)


def wash():
    """Broadband noise with a slightly wavering level: the far water is steady."""
    return coloured(WASH_COLOUR) * undb(WASH_DB + 1.0 * walk(25.))


def sloshes():
    """Low damped resonance: each dull slosh is a soft-started ring, a little to the left."""
    s, db, pitch_hz, t60 = np.transpose(SLOSHES)
    return grains(s, db, pitch_hz, t60, 2 + 0 * s, 0.022, 0, scatter=0)


def lake_stereo(hz):
    """Interchannel coherence, phase lag in radians and left minus right in dB at the lake."""
    share = np.interp(hz, [2110, 2900, 9000, 10900], [0.77, 0.12, 0.15, 0.75])
    late = 2 * np.pi * hz * WASH_LAG_S * (hz < 9000)  # the left leads, except in the top treble
    pan_db = np.interp(hz, [1000, 1300, 9000], [2.0, -2.0, 0.1])
    return share, late, pan_db


def lake():
    """Superposition of far wash, low sloshes and tiny specks of spray, diffuse from 2.9 to 9 kHz."""
    return stereo(wash() + sloshes() + ticks(SPECKS), lake_stereo)


def scene():
    """Linear crossfade: the mat gives way to the lake within 10 ms."""
    later = np.clip((np.arange(N) / SR - JUMP_S) / .01, 0, 1)
    return mat() * (1 - later) + lake() * later


def record(dry):
    """Low-pass filtering: a steep elliptic filter cuts the top."""
    return signal.sosfilt(signal.ellip(10, .2, 70, TOP_HZ, fs=SR, output="sos"), dry)


dry = scene()
out = record(dry)
transcribe(out)
```